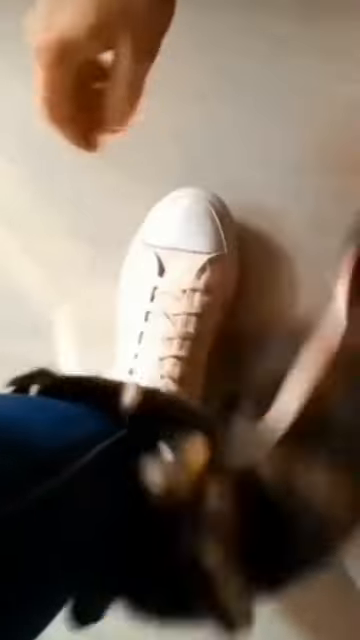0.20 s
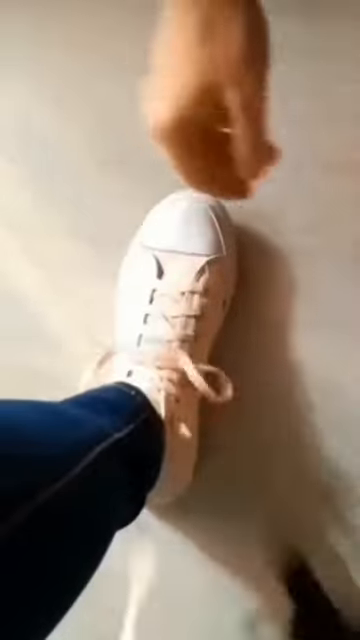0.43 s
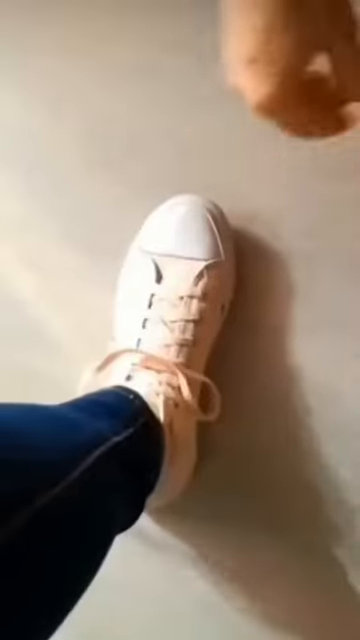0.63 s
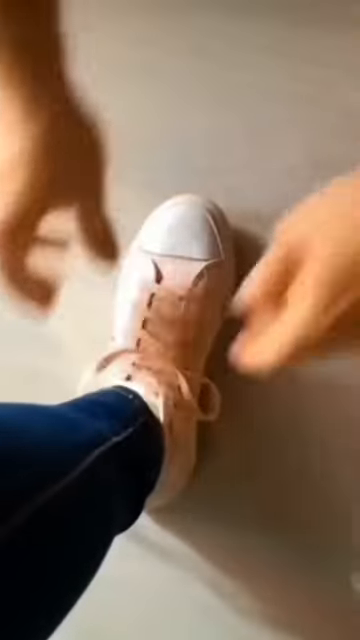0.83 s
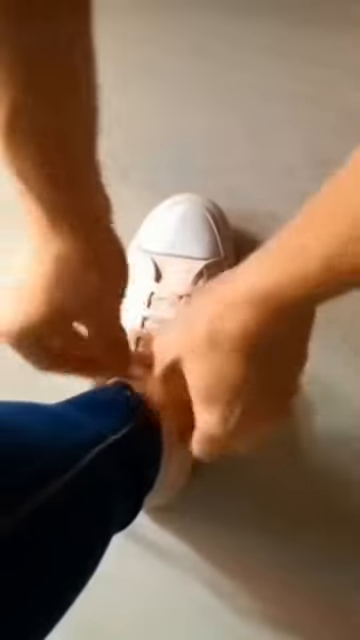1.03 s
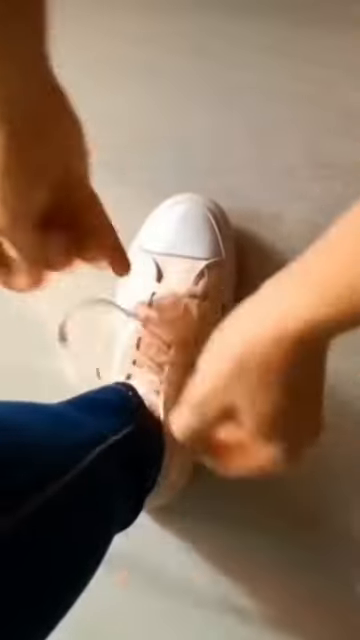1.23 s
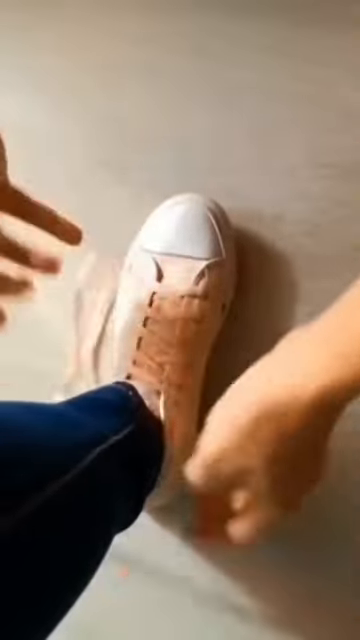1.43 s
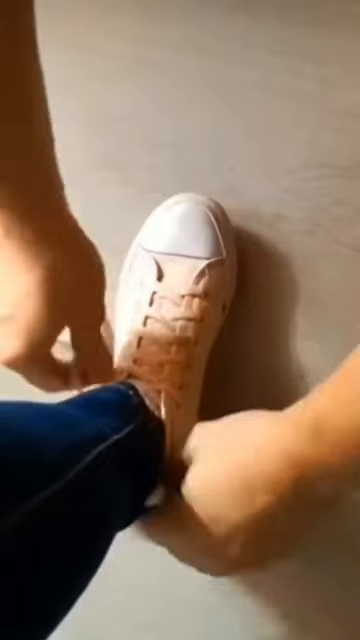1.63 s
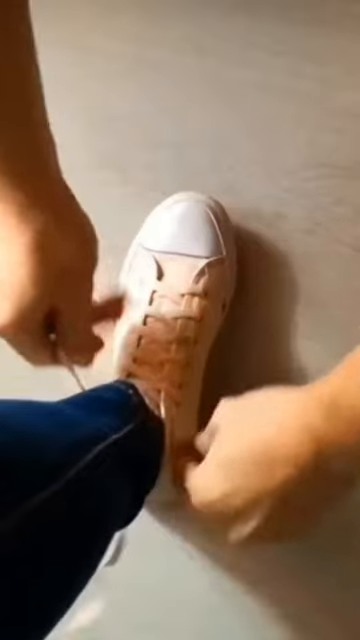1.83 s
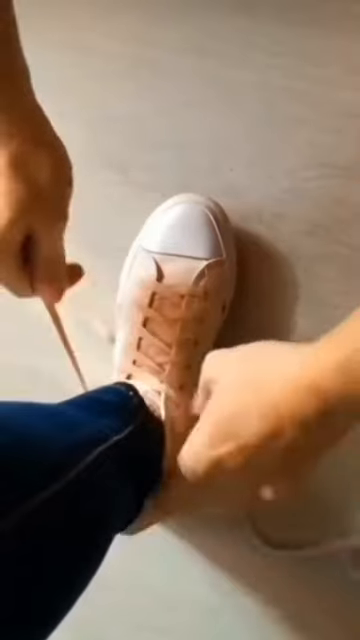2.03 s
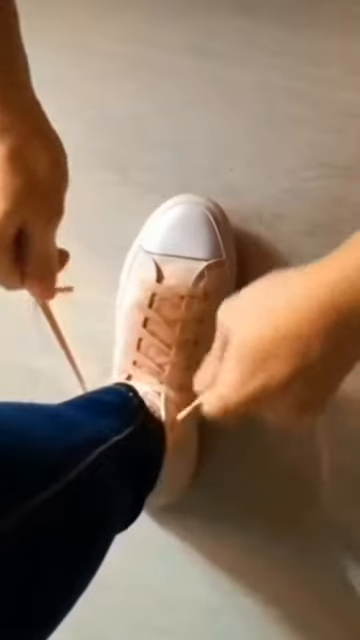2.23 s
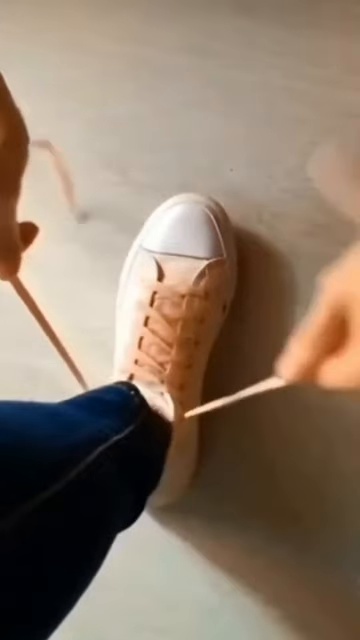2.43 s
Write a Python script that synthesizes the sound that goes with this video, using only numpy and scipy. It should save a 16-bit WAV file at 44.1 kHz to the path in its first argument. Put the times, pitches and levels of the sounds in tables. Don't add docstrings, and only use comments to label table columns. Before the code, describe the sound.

Canvas shoe rustling very close: a cat's paws and claws scrape, knock and bolt over a hard floor in the first half second, then quiet, then hands brush, tug and snap the laces in a small room.

```python
import sys
import numpy as np
from scipy import signal
from scipy.io import wavfile
from scipy.ndimage import uniform_filter1d, map_coordinates

SR = 44100
rng = np.random.default_rng(int(sys.argv[2]) if len(sys.argv) > 2 else 0)


def wrap_up_sound(samples):
    columns = np.atleast_2d(samples).T
    tamed = np.clip(columns, -1, 1)
    steps = np.round(tamed * 32767).astype(np.int16)
    wavfile.write(sys.argv[1], SR, steps)


def voltage_ratio(level):
    return 10 ** (np.asarray(level, float) / 20)


N = 110250

# (time [s], level [dB], brightness [dB per octave], left over right [dB])
CLIMB_RUB = [
    (0.0, -31.5, -4.5, 0),
    (0.082, -29.5, -0.5, -16),
    (0.178, -28, -2.5, -7.5),
    (0.2, -30.5, -5.5, -18.5),
    (0.282, -19.5, -2, -4),
    (0.3, -22.5, 0, 5),
]
KICK_RUB = [
    (.305, -24, 0, -4),
    (.31, -17, 0, -4),
    (.318, -17, 0, -3),
    (.320, -10, 1, -3),
    (.37, -9, 0, -2),
    (.41, -11, -3, -1),
    (.44, -11, -1, -1),
    (.465, -15, -1, -1),
    (.482, -18, -1, -1),
]
BOLT_RUB = [
    (0.482, -4.5, -3, -2),
    (.535, -14, -1.5, -0.24),
    (0.593, -13.5, 2.5, -0.47),
    (0.642, -22, -0.1, -1.7),
    (0.754, -24, -1.7, -1.3),
    (.83, -50.5, -1.5, 0),
]
# (time [s], level [dB], brightness [dB per octave], left over right [dB])
GATHER_RUB = [
    (1.0, -44, -2, -2),
    (1.046, -31, 2.5, 0),
    (1.146, -38.5, 0.5, -15.5),
    (1.206, -25, -4.5, -6),
    (1.29, -26.5, 5, -5.5),
    (1.35, -31, 3, -2.5),
    (1.391, -29.5, 4.5, -7),
    (1.501, -42, 1, -2.5),
]
PULL_RUB = [
    (1.572, -32.5, 0, -3),
    (1.58, -23.5, 1, -3),
    (1.66, -26.5, 4.5, -1),
    (1.71, -27, 0, 0),
    (1.77, -25.5, 1.5, -1),
    (1.86, -31, 1.5, -7),
    (1.912, -42, 8, -2),
    (1.924, -38, 4, -9),
    (1.93, -25, -1, -7.5),
]
SNAP_RUB = [(1.9485, -26, 0, -4), (1.9502, -10, 1.5, -4), (1.99, -16, 2.5, -2), (2.05, -21, 2, -2),
            (2.08, -28, 2, -1), (2.17, -35, 2, -3), (2.21, -27, 0, -6), (2.26, -26, 1, -3),
            (2.33, -30, 1, -3), (2.345, -40, 2, -1), (2.5, -32, 5, -7)]
# (pitch [Hz], level [dB per Hz])
RUSTLE_COLOUR = [(300, -16), (600, -30), (900, -14), (1510, 0.5), (3000, 2), (6250, 1.5), (9000, -17.5),
                 (10400, -23.5)]
# (time [s], level [dB])
FLOOR_RUMBLE = [
    (0.0, -24.5),
    (0.46, -20.5),
    (0.62, -25.5),
    (0.83, -26.5),
    (1.01, -42),
    (1.87, -32.5),
    (2.12, -43),
    (2.36, -44.5),
    (2.5, -32),
]
# (pitch [Hz], level [dB per Hz])
HUM_COLOUR = [(12, -30), (20, 8), (100, -1), (619, -21.5), (1710, -13.5), (2210, -19.5), (5360, -27.5),
              (9010, -32), (10000, -36), (13000, -66), (22000, -120)]
# (pitch [Hz], left-right likeness [0 to 1])
LIKENESS = [(40, .95), (180, .95), (400, .6), (2000, .55), (4500, .15), (9000, .4)]
# (time [s], peak [dB], pitch [Hz], ring fade [s], scuff fade [s])
PAW_KNOCKS = [(.112, -11, 1580, 0.0085, 0.11), (.2035, 2.5, 1757, 0.014, 0.02),
              (.2065, -5.5, 843, 0.021, 0.087), (.319, -2.5, 824, 0.03, 0.78), (.385, 2, 860, 0.03, 0.19),
              (.40, -5, 292, 0.05, 0.43), (.431, -3, 2990, 0.033, 0.093), (.436, -6, 2050, 0.016, 0.035),
              (.484, 6.5, 1216, 0.023, 0.11), (.486, -1, 440, 0.02, 0.15), (.484, 4, 570, 0.017, 0.063),
              (.484, -4, 180, 0.027, 0.12), (.2035, -14, 3200, 0.006, 0.017), (.2055, -17, 587, .02, 0.13),
              (.204, -6, 1190, 0.01, 0.028), (.497, 2, 965, 0.058, 0.15), (.522, -4.5, 878, 0.042, 0.31),
              (.525, -9.5, 240.5, 0.1, 0.27), (.74, -19.5, 400, 0.037, 0.16),
              (.835, -24.5, 490, 0.01, 0.08)]
LACE_KNOCKS = [(1.210, -9.5, 754, 0.035, 0.16), (1.269, -14.5, 5630, 0.012, 0.018),
               (1.33, -20.5, 816, 0.019, 0.17), (1.579, -12, 1710, 0.035, 0.55),
               (1.59, -16, 2240, 0.01, 0.76), (1.58, -15, 4280, 0.016, 1), (1.59, -27, 860, 0.1, 0.061),
               (1.763, -13.5, 2930, 0.0066, 0.037), (1.81, -22, 880, 0.0081, 0.4),
               (1.931, -10, 648, 0.043, 0.21), (1.933, -19.5, 1120, 0.027, 0.079),
               (1.9502, -5.5, 1170, 0.0065, 0.049), (1.9525, 0.5, 4740, 0.043, 0.15),
               (1.954, -12.5, 8200, 0.012, 0.23), (2.19, -23, 1940, .03, 0.19),
               (2.28, -36, 917, 0.07, 0.21)]
CLAW_KNOCKS = [(.068, -16, 2050, 0.0078, .04), (.112, -18, 5400, 0.0053, 0.039),
               (.2005, -19, 2480, 0.0027, 0.035), (.217, -8, 1810, 0.013, .06),
               (.311, -6, 2840, 0.014, .05), (.322, -5, 5100, 0.015, 0.14), (.356, -0.5, 5376, .02, 0.14),
               (.362, -4, 904, 0.037, 0.13), (.33, -3.5, 1410, 0.023, 0.43), (.354, -1.5, 1600, .015, 0.3),
               (.39, -1, 1450, 0.018, .2), (.377, -2.5, 2850, 0.02, 0.052), (.397, 3, 765, 0.047, 0.12),
               (.406, -2.5, 756, 0.032, 0.046), (.416, -4, 1980, 0.02, 0.15), (.460, -4, 880, 0.03, .04),
               (.510, -1, 1020, 0.057, 0.047), (.547, -5.5, 1025, 0.019, 0.093),
               (.582, -7, 1390, 0.037, 0.055), (.601, -10, 4030, 0.0055, .04)]
MORE_LACE_KNOCKS = [(1.014, -28, 5160, 0.0072, .05), (1.0495, -18.5, 5170, 0.013, 0.15),
                    (1.367, -16.5, 3780, 0.008, 0.19), (1.595, -14, 1650, .02, .12),
                    (1.63, -21, 6700, 0.028, 0.16), (1.763, -24, 4400, .006, .03),
                    (1.96, -17, 4560, 0.0065, 0.047), (1.9665, -5, 5100, 0.0072, 0.032),
                    (1.971, -1, 3500, .008, 0.11), (2.005, -18, 2300, 0.019, 0.044),
                    (2.031, -5, 4030, .004, .02), (2.215, -23.5, 1960, 0.025, 0.49),
                    (2.263, -15, 3500, 0.0085, 0.12), (1.58, -20.5, 1030, 0.017, 0.097),
                    (1.9505, -11, 702, 0.024, 0.088), (2.43, -27.5, 3000, 0.021, 0.27)]

GRAINS_PER_S, GRAIN_SPREAD_DB, GRAIN_CYCLES = 7000, -1, 21.8
PAN_DB_PER_OCTAVE, KNOCK_PAN_DB_PER_OCTAVE, KNOCK_PAN_DB = 0.5, -2, -0.5
HUM_DB = -37
MOTOR_HZ, MOTOR_WIDTH_HZ, MOTOR_DB = 88.5, 12.5, -39
KNOCK_RISE_CYCLES = 0.89
SCUFF_DB, SCUFF_WIDTH = -12.5, 0.25
CRACK_DB, CRACK_T60_S = -21.5, 0.0027
ROOM_T60_S, ROOM_DB, ROOM_LOW_HZ, WALL_CUT_HZ = 0.3, -13, 400, 5000
HOLE_HZ, HOLE_S, HOLE_DB, HOLE_RARITY = 85, 0.085, -26, 1.15
PATCH_DB = 3.6
MASKED_PER_DB = 0.45
ONSET_OPENS_PER_DB = 0.4
SEAM_HZ, SEAM_WIDTH_HZ, SEAM_DB = 6750, 110, -15
MIC_CUT_HZ, PORT_OFFSET = 10500, -0.007
CLIP_TOP, CLIP_HARDNESS = 0.97, 24


def in_time(rows):
    s, *columns = np.transpose(rows)
    return [np.interp(np.arange(N) / SR, s, column) for column in columns]


def at_hz(points, hz):
    table_hz, value = np.transpose(points)
    return np.interp(np.log(hz), np.log(table_hz), value)


def rms_one(x):
    return x / np.sqrt(np.mean(x ** 2) + 1e-20)


def lean(db):
    return np.array([[0.5], [-0.5]]) * db


def drift(rate):
    r = np.exp(-80 * np.pi * rate / SR)
    draws = rng.standard_normal(N // 40 + 2002)
    slow = signal.lfilter([1], [1, -2 * r, r * r], draws)[2000:]
    return np.interp(np.arange(N) / 40, np.arange(len(slow)), rms_one(slow))


def ring(clicks, hz, t60):
    r, w = voltage_ratio(-60 / (t60 * SR)), 2 * np.pi * hz / SR
    return signal.lfilter([0, np.sin(w)], [1, -2 * r * np.cos(w), r * r], clicks + 1e-18)


def spread(pair, hz):
    alike = np.clip(at_hz(LIKENESS, hz), 0, 1)
    shared = np.sqrt((1 + alike) / 2) * pair[0]
    opposite = np.sqrt((1 - alike) / 2) * pair[1] * [[1], [-1]]
    return shared + opposite


def rustle():
    rubs = np.vstack([CLIMB_RUB, KICK_RUB, BOLT_RUB, GATHER_RUB, PULL_RUB, SNAP_RUB])
    level_db, tilt_db, pan_db = in_time(rubs)
    sizes = voltage_ratio(GRAIN_SPREAD_DB * np.minimum(rng.exponential(1, (2, N)), 5))
    sizes = sizes * rng.choice([-1, 1], (2, N))
    chance = GRAINS_PER_S * voltage_ratio(2.5 * drift(40)) / SR
    catches = sizes * (rng.random((2, N)) < chance)
    group = rng.integers(0, 12, (2, N))
    out = 0
    for k, hz in enumerate(np.geomspace(350, 10600, 36)):
        patch = rms_one(ring(catches * (group == k % 12), hz, GRAIN_CYCLES / hz))
        gain_db = at_hz(RUSTLE_COLOUR, hz) + tilt_db * np.log2(hz / 4000) + 1.27 * drift(6.2)
        pan = lean(PAN_DB_PER_OCTAVE * np.log2(hz / 1500))
        out = out + voltage_ratio(gain_db + pan) * np.sqrt(hz) * spread(patch, hz)
    loudness = np.sqrt(uniform_filter1d(np.mean(out ** 2, axis=0), size=6000))
    return out / loudness * voltage_ratio(level_db + 1.5) * voltage_ratio(lean(pan_db))


def shake():
    level_db, = in_time(FLOOR_RUMBLE)
    band = signal.butter(2, [28.6, 350], "band", fs=SR, output="sos")
    rumble = rms_one(signal.sosfilt(band, rng.standard_normal((2, N))))
    return voltage_ratio(level_db - 6.5 + 1.4 * drift(29)) * spread(rumble, 100)


def hum():
    edges = 20 * 2 ** np.arange(0, 9.1, 0.5)
    white = rng.standard_normal((2, 2, N))
    out = 0
    for k, (low, high) in enumerate(zip(edges, edges[1:])):
        hz = np.sqrt(low * high)
        band = signal.butter(2, [low, high], "band", fs=SR, output="sos")
        noise = signal.sosfilt(band, white[k % 2])
        out = out + voltage_ratio(at_hz(HUM_COLOUR, hz) + 4.4 * drift(2.1)) * spread(noise, hz)
    drone = rms_one(ring(rng.standard_normal((2, N)), MOTOR_HZ, 2.8 / MOTOR_WIDTH_HZ))
    return voltage_ratio(HUM_DB) * rms_one(out) + voltage_ratio(MOTOR_DB) * spread(drone, MOTOR_HZ)


def knocks():
    out = np.zeros((2, N + SR))
    t = np.arange(SR // 2) / SR
    contacts = list(PAW_KNOCKS) + list(LACE_KNOCKS) + list(CLAW_KNOCKS) + list(MORE_LACE_KNOCKS)
    for s, db, hz, t60, scuff_t60 in contacts:
        noise = rng.standard_normal((2, len(t)))
        rise = np.sin(np.pi / 2 * np.minimum(t * hz / KNOCK_RISE_CYCLES, 1)) ** 2
        blow = np.sin(2 * np.pi * hz * t) * voltage_ratio(-60 * t / t60) * rise
        edges = [hz / (1 + SCUFF_WIDTH), hz * (1 + SCUFF_WIDTH)]
        band = signal.butter(2, edges, "band", fs=SR, output="sos")
        scuff = spread(rms_one(signal.sosfilt(band, noise)), hz)
        scuff = scuff * voltage_ratio(SCUFF_DB - 60 * (t / scuff_t60) ** 1.32) * rise
        crack = noise[0] * voltage_ratio(CRACK_DB - 60 * t / CRACK_T60_S)
        pan = lean(KNOCK_PAN_DB_PER_OCTAVE * np.log2(hz / 1500))
        i = int(s * SR)
        out[:, i:i + len(t)] += voltage_ratio(db + pan) * (blow + scuff + crack)
    return out[:, :N] * voltage_ratio(lean(KNOCK_PAN_DB))


def room(x):
    out = np.zeros((2, N))
    dull = np.exp(-2 * np.pi * WALL_CUT_HZ / SR)
    lags = (rng.uniform(0.010, 0.03, 12) * SR).astype(int)
    for k, lag in enumerate(lags):
        loop, state = x.copy(), [0.]
        gain = voltage_ratio(-60 * lag / SR / ROOM_T60_S)
        for i in range(lag, N, lag):
            back, state = signal.lfilter([gain * (1 - dull)], [1, -dull], loop[i - lag:i], zi=state)
            loop[i:i + lag] += back[:N - i]
        out[k % 2] += (loop - x) * (-1) ** (k // 2)
    return out


def patchy_spots(x):
    hz, s, bins = signal.stft(x, SR, nperseg=1024, noverlap=768)
    step_hz, step_s = np.meshgrid(hz / HOLE_HZ, s / HOLE_S, indexing="ij")
    field = map_coordinates(rng.standard_normal((400, 120)), [step_hz, step_s], order=3)
    energy = np.abs(bins) ** 2
    power = uniform_filter1d(np.mean(energy, axis=0), size=9, axis=1) + 1e-14
    narrow = uniform_filter1d(power, size=3, axis=0)
    wide = uniform_filter1d(power, size=21, axis=0)
    contrast_db = 10 * np.log10(narrow / wide)
    openness = field + MASKED_PER_DB * np.maximum(contrast_db, -3.0) + np.maximum(contrast_db + 3, 0)
    now = np.sum(energy, axis=(0, 1)) + 1e-14
    onset_db = np.maximum(10 * np.log10(now / uniform_filter1d(now, size=15)), 0)
    openness = openness + ONSET_OPENS_PER_DB * onset_db
    patch_db = PATCH_DB * field * np.clip(hz / 1500 - 0.6, 0, 1)[:, None]
    hole_db = HOLE_DB / (1 + np.exp(6.0 * (openness + HOLE_RARITY)))
    seam_db = SEAM_DB * np.exp(-((hz - SEAM_HZ) / SEAM_WIDTH_HZ) ** 2)
    gain_db = (patch_db + hole_db) * np.clip(hz / 600 - 0.4, 0, 1)[:, None] + seam_db[:, None]
    return signal.istft(bins * voltage_ratio(gain_db), SR, nperseg=1024, noverlap=768)[1][:, :N]


def scene():
    near = rustle() + knocks()
    no_bass = signal.butter(2, ROOM_LOW_HZ, "high", fs=SR, output="sos")
    echoes = signal.sosfilt(no_bass, room(near.mean(axis=0)))
    return near + voltage_ratio(ROOM_DB) * echoes + shake() + hum()


def low_pass(x):
    return signal.sosfilt(signal.butter(12, 15920, fs=SR, output="sos"), x)


def record(dry):
    mic = signal.cheby2(16, 50, MIC_CUT_HZ, fs=SR, output="sos")
    x = signal.sosfilt(mic, patchy_spots(dry)) + PORT_OFFSET
    mix = x / (1 + np.abs(x / CLIP_TOP) ** CLIP_HARDNESS) ** (1 / CLIP_HARDNESS)
    return low_pass(mix)


dry = scene()
out = record(dry)
wrap_up_sound(out)
```